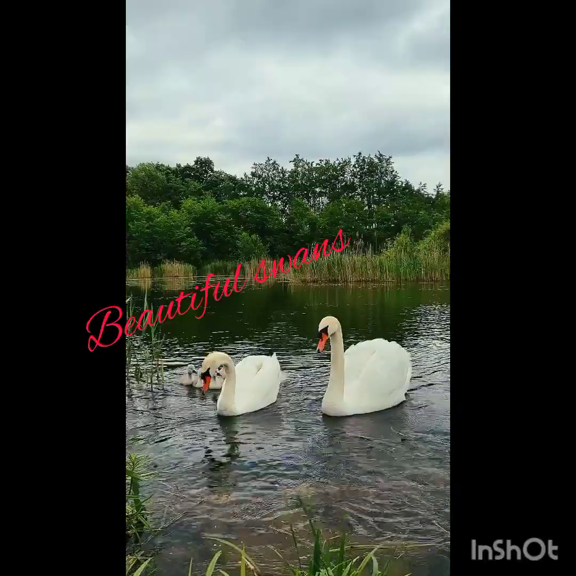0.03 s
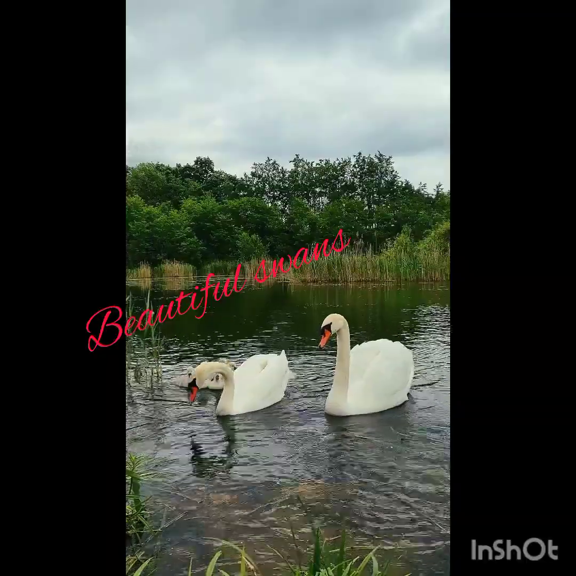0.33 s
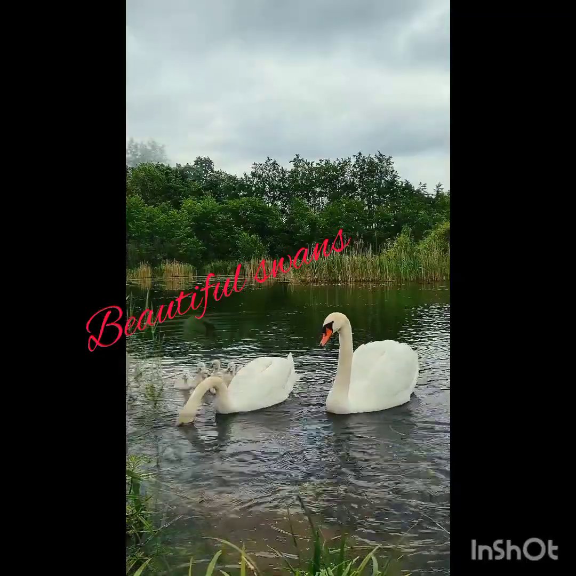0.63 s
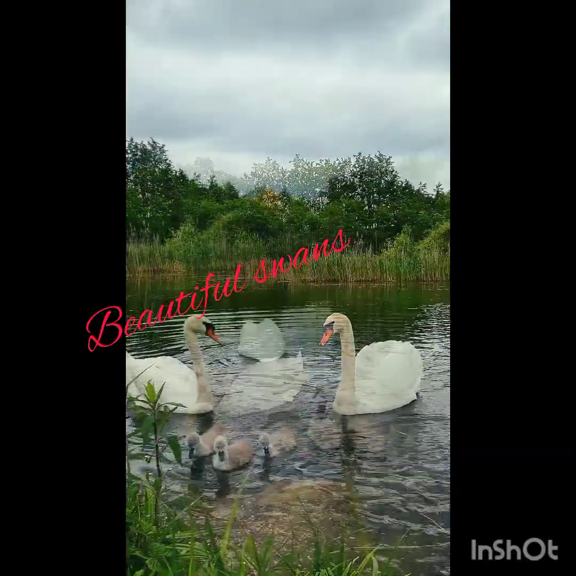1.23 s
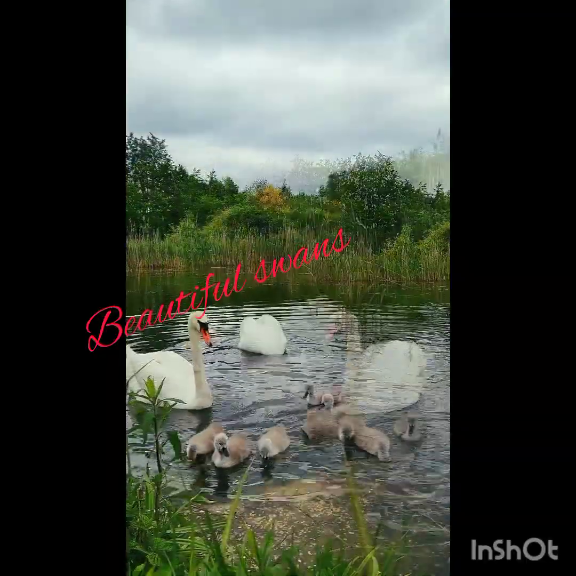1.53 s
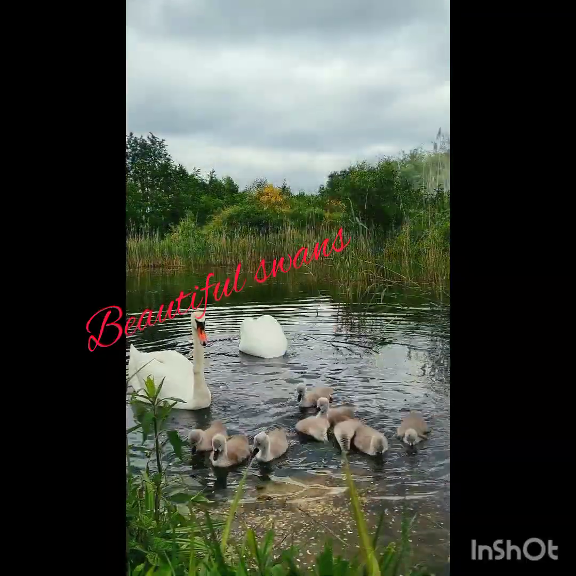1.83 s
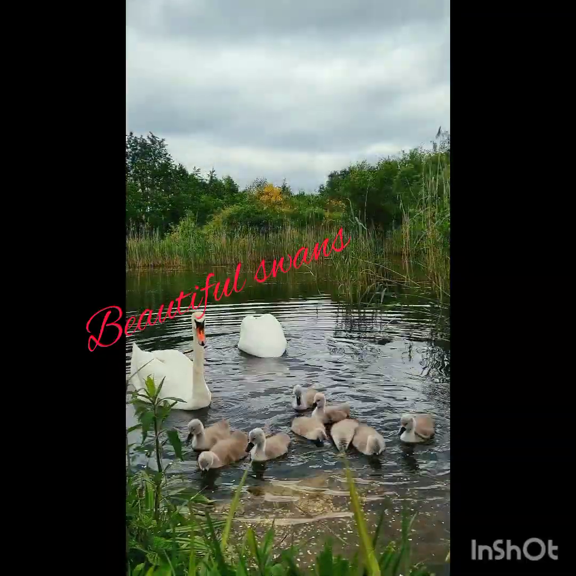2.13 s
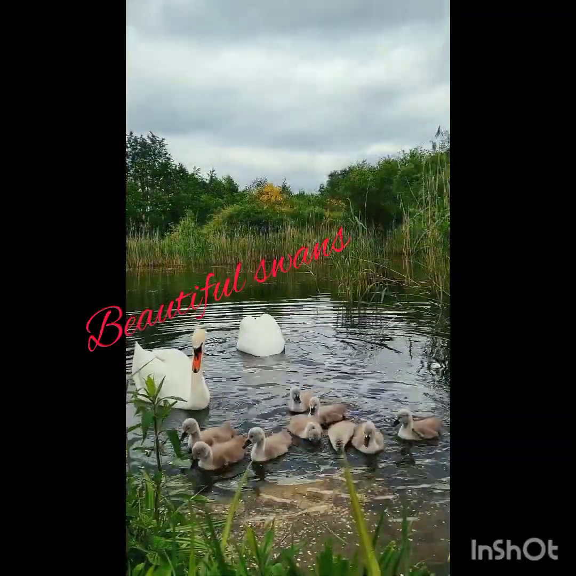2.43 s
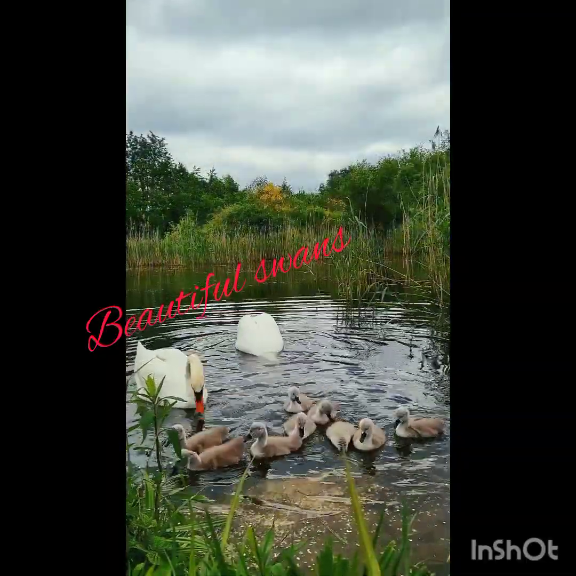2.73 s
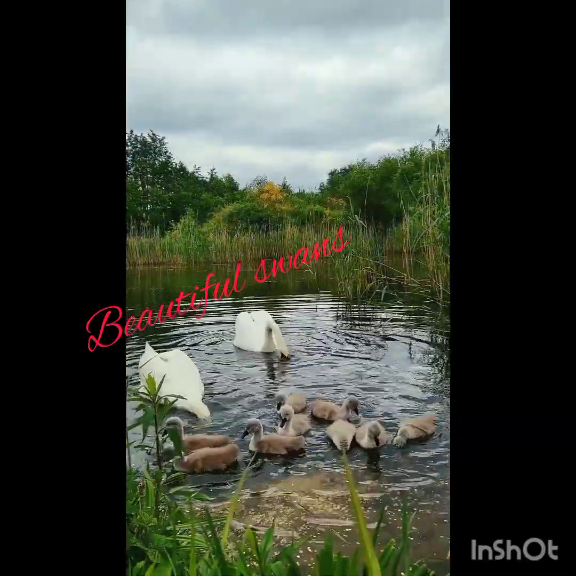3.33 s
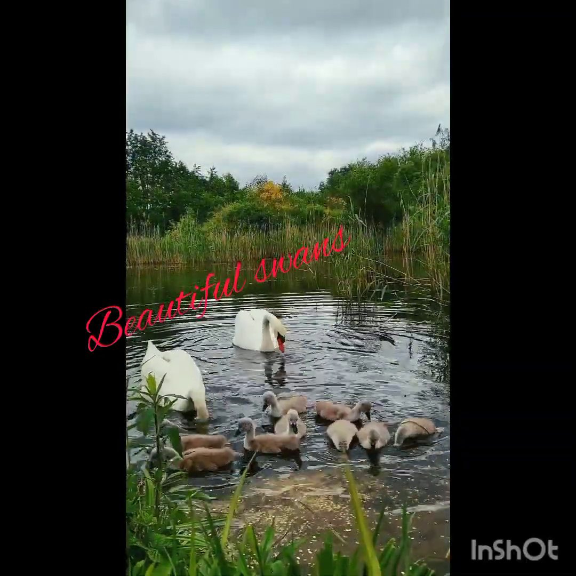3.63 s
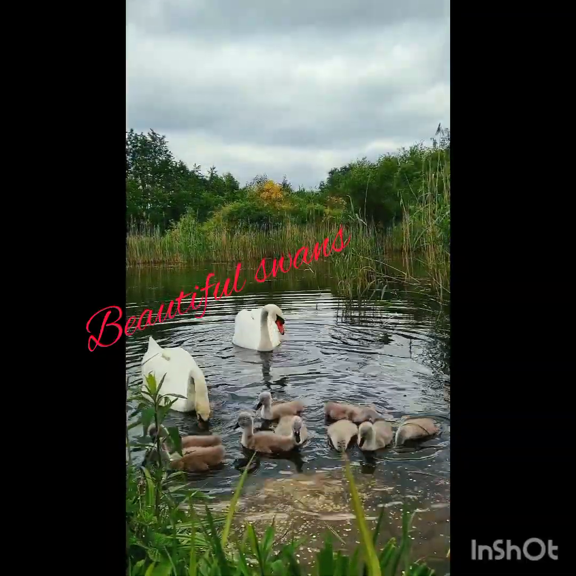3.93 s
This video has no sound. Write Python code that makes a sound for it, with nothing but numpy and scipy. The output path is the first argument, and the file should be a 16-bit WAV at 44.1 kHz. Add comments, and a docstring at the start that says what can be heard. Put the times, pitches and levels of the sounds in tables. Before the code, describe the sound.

A frog croaks steadily over soft peeps of young swans and low wind rumble.

```python
"""Wind rumbles on the microphone while a frog croaks about four times a second, with others far off.
Each croak is a quick run of pulses that ring the frog's vocal sacs. On this reedy pond, young swans
(cygnets) peep in soft arched whistles among small splashes, clucks, far chirps and low sliding tones.
Later a dry rattle bursts from the reeds, a small bird answers with falling calls,
and one pure note swells far away."""
import sys
import numpy as np
from scipy import signal
from scipy.fft import rfft, irfft
from scipy.io import wavfile

SR = 44100
rng = np.random.default_rng(int(sys.argv[2]) if len(sys.argv) > 2 else 0)


def master_out(mix):
    """Clip the mix to full scale and print it as 16-bit PCM to the path in sys.argv[1]."""
    frames = np.transpose(np.atleast_2d(mix))
    ceiling = np.clip(frames, -1, 1)
    pcm = np.round(ceiling * 32767).astype(np.int16)
    wavfile.write(sys.argv[1], SR, pcm)


N = 176400
T = np.arange(N) / SR


def from_db(db):
    """Turn decibels into a number to multiply a sound by."""
    return 10 ** (np.asarray(db) / 20)


def rms_one(x):
    """Scale a sound so that its average strength (rms) is 1."""
    return x / np.sqrt(np.mean(x ** 2) + 1e-20)


def curve(rows, t=T):
    """Join the values in each column of a table by straight lines in time."""
    times, *columns = np.transpose(rows)
    return [np.interp(t, times, column) for column in columns]


def at_hz(points, hz):
    """Read between the rows of a frequency table, giving each octave equal room."""
    f, value = np.transpose(points)
    return np.interp(np.log(hz), np.log(f), value)


def drift(rate):
    """A random wobble around zero that heads for a new value `rate` times a second."""
    targets = rng.standard_normal(4000)
    return np.interp(T * rate, np.arange(4000), targets) * 1.1


def pan(db):
    """Left and right gains; a positive pan makes the left louder by that many dB."""
    return from_db(np.array([[db], [-db]]) / 2)


def add(out, start, sound):
    """Mix a short sound in at a start time in seconds."""
    i = max(int(start * SR), 0)
    part = sound[..., :max(N - i, 0)]
    out[..., i:i + part.shape[-1]] += part


def noise(colour):
    """Stereo noise shaped by rows of f/Hz, level/dB; the two sides are most alike in the bass."""
    # how alike left and right are: f/Hz, likeness (1 = the same)
    likeness = [(30, 0.71), (100, 1), (300, 0.65), (1000, 0.2), (2500, 0.033), (6000, 0.02), (15000, 0.094)]
    hz = np.maximum(np.arange(N // 2 + 1) * SR / N, 1)
    octaves_outside = np.maximum(np.log2(colour[0][0] / hz), 0) + np.maximum(np.log2(hz / colour[-1][0]), 0)
    mid, side = rfft(rng.standard_normal((2, N))) * from_db(at_hz(colour, hz) - 20 * octaves_outside)
    alike = np.clip(at_hz(likeness, hz), -1, 1)
    return rms_one(irfft(np.sqrt(1 + alike) * mid + np.sqrt(1 - alike) * side * [[1], [-1]], N))


def pond(x, echo_db, fade_s, lead_s=.00009):
    """A sound reaches the left first, then echoes off near reeds and the far bank (60 dB down at fade_s)."""
    t = T[:SR // 2]
    reeds = rms_one(np.exp(-t / .0045) * (t > .002))
    bank = rms_one(from_db(-60 * t / fade_s) * (1 - np.exp(-t / .004)))
    scatter = rng.standard_normal((2, len(t))) + .8 * rng.standard_normal(len(t))  # sides partly alike
    echo = rms_one(scatter * (.5 * reeds + bank)) / np.sqrt(len(t))
    direct = np.array([x[0], np.interp(T - lead_s, T, x[1])])
    return direct + from_db(echo_db) * signal.fftconvolve(x, echo, axes=1)[:, :N]


def whistle(hz, db):
    """A pure tone that follows a pitch and a level."""
    return from_db(db) * np.sin(2 * np.pi * np.cumsum(hz) / SR)


def arches(notes, flutter_db=3.5, octave_db=-23):
    """Husky, wavering tones that bend through three pitches, with a faint copy an octave up."""
    out = np.zeros((2, N))
    waver, flutter, husk = drift(220), drift(120), drift(700)
    for start, length, first, middle, last, db, pan_db in notes:
        progress = np.arange(int(length * SR)) / (length * SR)
        t = start + progress * length
        arch = np.polyval(np.polyfit([0, .5, 1], [first, middle, last], 2), progress)
        hz = arch * (1 + .013 * np.interp(t, T, waver))
        level = db + flutter_db * np.interp(t, T, flutter)
        rough = np.interp(t * middle / 2500, T, husk, period=T[-1])  # higher notes tremble faster
        swell = np.sin(np.pi * progress) ** 0.24 * (1 + .3 * rough)
        tone = whistle(hz, level) + whistle(2 * hz, level + octave_db)
        add(out, start, pan(pan_db) * swell * tone)
    return out


def wind():
    """Gusts on the microphone make a deep rumble and a slightly higher buffeting."""
    # strength of each over time: t/s, level/dB
    rumble_level = [(0.02, -20.5), (0.78, -25.5), (0.83, -30.5), (1.1, -25.5), (2.3, -23.5), (2.32, -11),
                    (2.48, -29), (2.54, -17), (2.96, -18.5), (3.01, -37), (3.1, -12.5), (3.39, -23),
                    (3.43, -14), (4.0, -27.5)]
    buffet_level = [(0.02, -8.5), (0.06, -13.5), (0.11, -24.5), (0.3, -15), (0.33, -26.5), (0.41, -12.5),
                    (0.45, -28.5), (0.56, -12), (0.63, -33), (0.67, -19), (0.76, -32), (3.41, -21),
                    (4.0, -23.5)]
    # tone colour of each: f/Hz, level/dB
    rumble_colour = [(25, -19), (40, -14.5), (55, -5), (70, 2.5), (90, -9), (115, -35), (160, -23.5)]
    buffet_colour = [(75, -28), (100, 5), (130, 1), (160, -9), (210, -25), (300, -31.5), (450, -44)]
    rumble = from_db(curve(rumble_level)[0]) * noise(rumble_colour)
    buffet = from_db(curve(buffet_level)[0]) * noise(buffet_colour)
    return rumble + buffet


def still_air(db=-41.5):
    """A faint, steady hush."""
    # tone colour of the hush: f/Hz, level/dB
    colour = [(200, 14.5), (280, 8.5), (430, -5), (800, -6.5), (1400, -16), (2000, -50), (3000, -18),
              (8000, -15), (10600, -10.5), (15500, -20)]
    return from_db(db) * noise(colour)


def drone():
    """A low, far-off band of noise that swells and fades."""
    # its strength over time: t/s, level/dB
    level = [(0, -44.5), (.8, -53), (1.0, -42.5), (1.3, -38.5), (1.52, -55), (3, -66)]
    # its tone colour: f/Hz, level/dB
    colour = [(150, -47), (230, -12), (300, -3), (500, -18), (1000, -31)]
    return from_db(curve(level)[0]) * noise(colour)


def frog_chorus(flutter_db=1.5):
    """Many far frogs blur into one fluttering noise."""
    # its strength over time: t/s, level/dB
    level = [(0, -28), (.11, -41), (.5, -39.5), (.72, -43), (1.25, -50), (2.2, -46), (3.4, -44.5),
             (4, -46.5)]
    # its tone colour: f/Hz, level/dB
    colour = [(600, -30), (1100, -7), (1600, -0.5), (2800, 1), (3600, -8), (4600, -20), (7000, -27.5)]
    return from_db(curve(level)[0] + flutter_db * drift(65)) * noise(colour)


def far_calls():
    """High chirps from the far trees and low sliding tones within the drone, blurred by echoes."""
    # the notes: t/s, length/s, first f/Hz, middle f/Hz, last f/Hz, level/dB, pan/dB
    chirps = [(.865, 0.047, 4100, 4140, 4240, -48, 6), (1.213, .08, 3280, 3310, 3040, -50.5, 9.1),
              (1.28, .025, 2970, 2900, 2820, -51.5, 9.9)]
    moans = [(.97, 0.14, 291.8, 297.4, 272, -36, 0), (1.16, .08, 241, 239, 205, -39.5, 0),
             (1.18, 0.127, 345, 315, 263, -46, 0)]
    return pond(arches(chirps), echo_db=0.5, fade_s=0.72) + pond(arches(moans), echo_db=-12, fade_s=0.32)


def hoot():
    """One long, pure note swells far away."""
    # path of the note: t/s, f/Hz, level/dB
    note = [(3.51, 564, -76), (3.58, 560, -42), (3.75, 555.5, -32), (4.0, 555, -31.5)]
    return pan(3) * whistle(*curve(note)) * (T > note[0][0])


def clucks(roughness=0.17):
    """Soft, low notes from a far waterbird; a fast pitch wobble makes them husky."""
    # the clucks: t/s, length/s, f/Hz, level/dB
    notes = [(0.097, 0.025, 954, -42.5), (0.719, 0.038, 707, -45), (1.675, 0.033, 933, -41.5)]
    out, wobble = np.zeros(N), drift(600)
    for start, length, hz, db in notes:
        progress = np.arange(int(length * SR)) / (length * SR)
        pitch = hz * (1 + roughness * np.interp(start + progress * length, T, wobble))
        add(out, start, np.sin(np.pi * progress) * whistle(pitch, db))
    return pond(pan(0) * out, echo_db=4.5, fade_s=0.28)


def splashes():
    """Dabbling bills throw up spray: bright noise that starts at once and dies away."""
    # the splashes: t/s, decay/s, level/dB
    dabbles = [(0.564, 0.028, -43.5), (1.059, 0.058, -47.5), (1.422, 0.0051, -41.5), (1.729, 0.13, -48),
               (2.107, 0.00077, -30)]
    # tone colour of the spray: f/Hz, level/dB
    colour = [(1500, -21), (4000, 9), (6500, 13), (10000, 13.5), (15000, -16)]
    level = sum(from_db(db) * (T > start) * np.exp(-np.abs(T - start) / decay)
                for start, decay, db in dabbles)
    return level * noise(colour)


def small_bird(pan_db=5):
    """A two-step falling note with a short echo, then two plunging calls that echo from the trees."""
    # the two-step note: t/s, f/Hz, level/dB
    slur_path = [(3.18, 6190, -55), (3.19, 5530, -38.5), (3.215, 5470, -56), (3.228, 4240, -51),
                 (3.242, 3660, -51), (3.27, 3700, -52), (3.29, 3500, -47)]
    # the plunging calls: t/s, level/dB
    call_starts = [(3.572, -38.5), (3.913, -34.5)]
    # the shape both calls share: t/s from the call's start, f/Hz, level/dB
    call_shape = [(0, 6780, -7), (.008, 5460, -5), (.016, 4136, -4.5), (.05, 3980, -12), (.066, 3800, 2.5),
                  (.082, 3436, -20), (.1, 3700, -30)]
    calls, slur = np.zeros((2, N))
    call = whistle(*curve(call_shape, np.arange(0, call_shape[-1][0], 1 / SR)))
    for start, db in call_starts:
        add(calls, start, from_db(db) * call)
    slur_t = np.arange(slur_path[0][0], slur_path[-1][0], 1 / SR)
    add(slur, slur_t[0], whistle(*curve(slur_path, slur_t)))
    return (pond(pan(pan_db) * calls, echo_db=4.5, fade_s=0.92, lead_s=.00004)
            + pond(pan(pan_db) * slur, echo_db=6, fade_s=.3, lead_s=.00004))


def rattle(bright_width_hz=1200, hiss_db=-18):
    """Six harsh clacks, slowing down: bursts of noise that all ring the same throat."""
    # the clacks: t/s, length/s, level/dB, brightest f/Hz
    clacks = [(2.793, 0.014, -39.5, 2100), (2.826, 0.0087, -32, 2660), (2.859, 0.014, -27, 3670),
              (2.897, 0.011, -26.5, 3400), (2.934, 0.013, -28, 2900), (2.981, 0.011, -27.5, 2470)]
    # pitches at which the throat rings: f/Hz, width/Hz, level/dB
    throat_rings = [(1200, 700, -7), (2000, 400, 3), (2850, 420, 1), (3400, 320, 3), (4076, 240, 0),
                    (4600, 900, -6)]
    bursts, t = np.zeros(N), T[:SR // 20]
    for start, length, db, hz in clacks:
        puff = np.sin(np.pi * np.minimum(t / length, 1)).clip(0) * rng.standard_normal(len(t))
        bright = signal.lfilter(*signal.iirpeak(hz, hz / bright_width_hz, SR), puff)
        add(bursts, start, from_db(db) * rms_one(puff + bright) * np.sqrt(t[-1] / length))
    bursts += 1e-18  # keeps the filters fast during silence
    throat = np.zeros(N)
    for k, (hz, width, db) in enumerate(throat_rings):
        ring = signal.lfilter(*signal.iirpeak(hz, hz / width, SR), bursts)
        throat += (-1) ** k * from_db(db) * ring  # flipped signs avoid gaps between neighbours
    throat = signal.sosfilt(signal.butter(3, [850, 5700], "band", fs=SR, output="sos"), throat + 1e-18)
    hiss = signal.sosfilt(signal.butter(4, 9900, fs=SR, output="sos"), bursts)
    voice = rms_one(throat) * bursts.std() + from_db(hiss_db) * hiss
    return pond(pan(4) * voice, echo_db=-8.5, fade_s=.2, lead_s=.00007)


def cygnets(db=-1.5):
    """Young swans whistle thin, soft peeps on the water."""
    # the peeps: t/s, length/s, first f/Hz, middle f/Hz, last f/Hz, level/dB, pan/dB
    peeps = [(0.298, 0.038, 2430, 2210, 1900, -32.5, 2), (0.345, 0.044, 2520, 2760, 2810, -38, 8),
             (0.526, 0.097, 1904, 2450, 2260, -35.5, 4), (0.535, 0.11, 1785, 1715, 1740, -33, 0),
             (0.722, 0.11, 2064, 2650, 3100, -41.5, 5), (0.782, 0.14, 1816, 2213, 2400, -38, 3),
             (0.91, 0.15, 1860, 2780, 2140, -38, 6), (0.897, 0.25, 1940, 1962, 1770, -35.5, 1.5),
             (1.455, 0.041, 1720, 1838, 1750, -35.5, -8), (1.63, 0.16, 2070, 2990, 2980, -38, 5.5),
             (1.84, .089, 2295, 2600, 2250, -42.5, 8), (2.002, 0.11, 2310, 2810, 1910, -35, 3),
             (2.187, 0.088, 1865, 2140, 1710, -34, 0), (2.197, 0.09, 2120, 2560, 2120, -39, 3),
             (2.311, 0.081, 2696, 2654, 1800, -34.5, 2), (2.378, .11, 2097, 2510, 2230, -50, 6),
             (2.536, 0.093, 2580, 2680, 1780, -37.5, 2), (2.655, 0.11, 1970, 2460, 2780, -34.5, 1),
             (2.933, 0.052, 1820, 2260, 2350, -29.5, -2), (3.129, 0.12, 2236, 2716, 2420, -38, 11),
             (3.385, 0.13, 2000, 2650, 2280, -37, 5), (3.556, 0.059, 2200, 2590, 2560, -44.5, 10),
             (3.857, .088, 2205, 2795, 3010, -45, 7)]
    return from_db(db) * pond(arches(peeps), echo_db=-9, fade_s=.35)


def sac_ring(t, hz, width_s, phase, sweep_per_s=35, rasp_s=.005):
    """One pulse rings a vocal sac: a rising blip, loudest at t = 0, that leaves a short rasp."""
    slide = t + sweep_per_s * t ** 2 / 2
    blip = np.exp(-(t / width_s) ** 2) * np.cos(2 * np.pi * hz * slide + phase)
    grit = [np.interp(t, t[::64], rng.standard_normal(len(t[::64]))) for _ in range(2)]
    angle = 2 * np.pi * hz * t
    rasp = grit[0] * np.cos(angle) + grit[1] * np.sin(angle)  # noise close to the blip's pitch
    return blip + .33 * rasp * np.exp(np.minimum(t / width_s, -t / rasp_s))


def croaking(croaks, pan_db, jitter_s=.0005, lag_s=.003, spread_db=1.2):
    """Each croak is a run of pulses that swells and fades, ringing the vocal sacs at five pitches."""
    # how the sacs ring: multiple of the pitch, level/dB, half-length/s, extra pan/dB
    sac_modes = [(0.681, -19.5, 0.0037, 6), (0.802, -16, 0.0012, -5), (0.997, -2, 0.003, -3.5),
                 (1.202, -7.5, 0.0027, -5), (1.404, -14, 0.0017, 12)]
    out, t = np.zeros((2, N)), T[:SR // 25] - .008
    for start, count, rate, db, hz, crest, climb in croaks:
        tuning = 1 + 0.037 * rng.standard_normal(len(sac_modes))  # no two croaks are quite alike
        lean = np.log(.5) / np.log(crest)  # moves the top of the swell to the crest
        for k in range(count):
            effort = np.sin(np.pi * ((k + .5) / count) ** lean) ** .85
            from_middle_s = (k - (count - 1) / 2) / rate
            pitch = hz * (1 + 0.096 * (effort - 1) + climb * from_middle_s)  # weak pulses are lower
            late, stretch = rng.standard_normal(2)
            pulse_s = start + k / rate + jitter_s * late
            for (ratio, mode_db, width, side_db), tuned in zip(sac_modes, tuning):
                strength, detune, phase = rng.standard_normal(3)
                mode_hz = pitch * ratio * tuned * (1 + .03 * detune)
                ring = sac_ring(t, mode_hz, width * np.exp(.2 * stretch), phase)
                gain = pan(pan_db + side_db) * effort * from_db(db + mode_db + spread_db * strength)
                add(out, pulse_s + lag_s * (ratio - 1) + t[0], gain * ring)  # higher rings come later
    return out


def frogs():
    """One frog croaks close by throughout; a few far, more echoing croaks join it at the start."""
    # the croaks: t/s, pulse count, pulse rate/Hz, level/dB, f/Hz,
    # crest (place of the strongest pulse, 0-1), pitch climb/(share per s)
    near_croaks = [(.247, 6, 93, -14.5, 1710, 0.41, -1), (.487, 5, 81, -14.5, 1826, 0.47, 0.5),
                   (.781, 6, 79, -22, 1650, 0.51, 1), (1.025, 2, 108, -20, 1720, .6, -0.5),
                   (1.057, 3, 76, -10.5, 2045, 0.48, 9.5), (1.109, 1, 80, -25.5, 2430, .5, 0),
                   (1.386, 5, 82, -22, 1650, 0.58, 3.5), (1.507, 4, 75, -17, 1780, 0.32, 1.5),
                   (1.702, 6, 81, -13, 1960, 0.55, -1.5), (1.938, 5, 76, -16, 2030, 0.53, -1.5),
                   (2.171, 4, 80, -25.5, 1700, 0.32, -7), (2.272, 5, 87, -16.5, 1860, 0.67, 0),
                   (2.503, 4, 78, -16.5, 1944, 0.51, 3.5), (2.733, 4, 113, -12, 1770, 0.58, 7.5),
                   (2.909, 3, 88, -15.5, 1595, 0.7, -3), (3.066, 4, 72, -16, 1847, 0.2, -2.5),
                   (3.269, 6, 84, -14.5, 1976, 0.53, -3), (3.493, 5, 83, -14, 1900, 0.44, -0.5),
                   (3.653, 3, 55, -29, 1665, 0.44, -0.5), (3.799, 5, 80, -16.5, 1990, 0.51, 0.5),
                   (3.966, 6, 89, -15, 1786, 0.63, -6.5)]
    far_croaks = [(.035, 3, 109.8, -26, 2300, 0.71, -13), (.085, 5, 105.7, -26, 2100, 0.44, -8),
                  (.399, 3, 109.9, -25, 2095, 0.15, -3)]
    near = pond(croaking(near_croaks, pan_db=1), echo_db=-6, fade_s=.18)
    far = pond(croaking(far_croaks, pan_db=6), echo_db=-0.5, fade_s=.18)
    return near + far


def scene():
    """Everything heard from the bank."""
    croaks = frogs()
    background = wind() + frog_chorus() + drone() + still_air()
    calls = cygnets() + far_calls() + rattle() + small_bird() + clucks() + hoot()
    return background + splashes() + calls + croaks


def record(dry, ceiling=.86, cutoff_hz=15700):
    """Round off the highest peaks and cut the very top of the treble steeply."""
    rounded = dry / (1 + (dry / ceiling) ** 6) ** (1 / 6)
    return signal.sosfilt(signal.ellip(10, .2, 90, cutoff_hz, fs=SR, output="sos"), rounded)


dry = scene()
out = record(dry)
master_out(out)
```